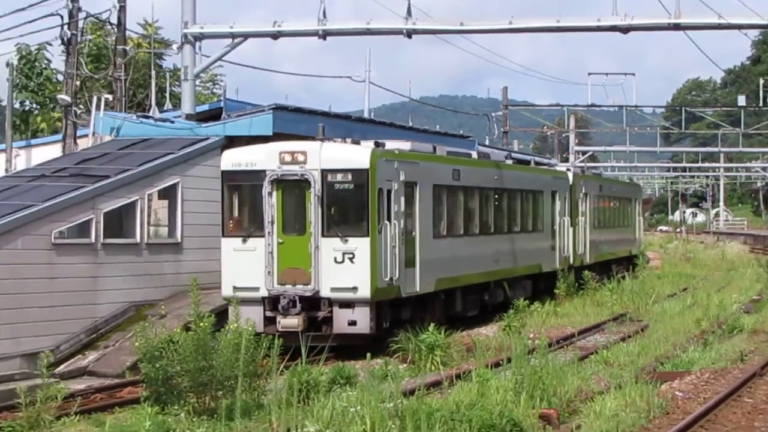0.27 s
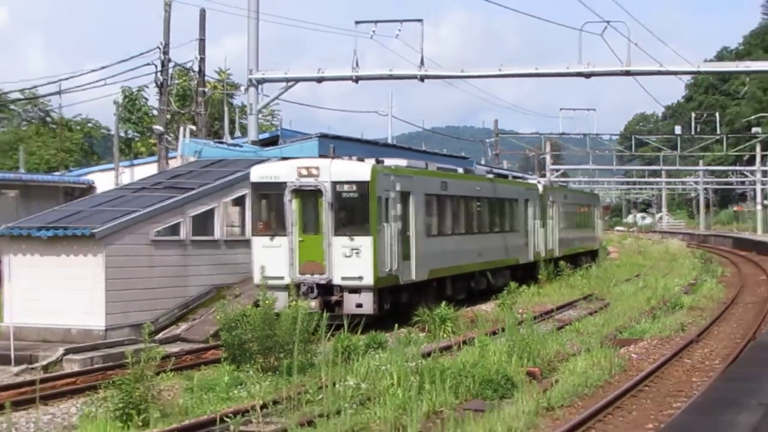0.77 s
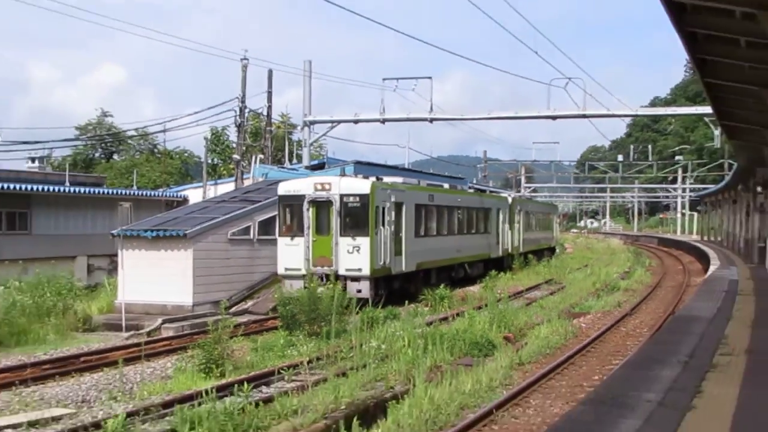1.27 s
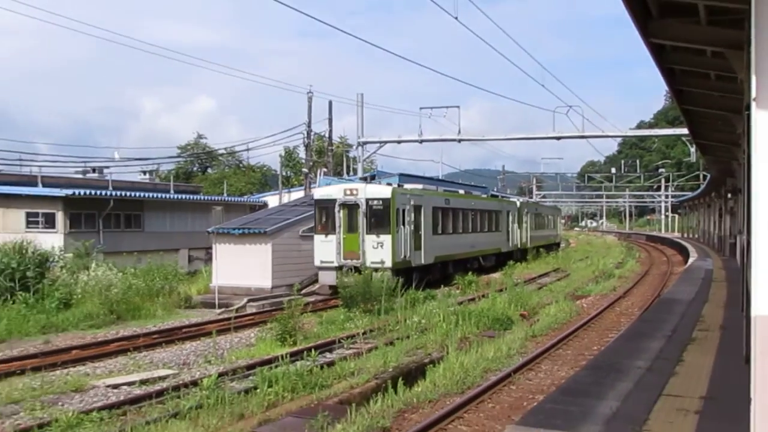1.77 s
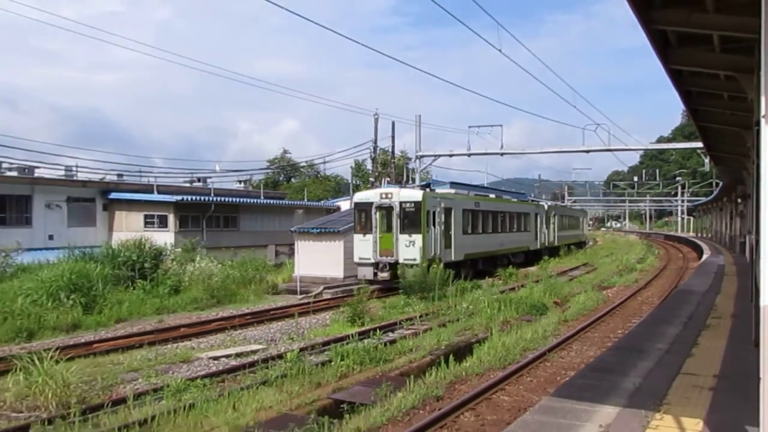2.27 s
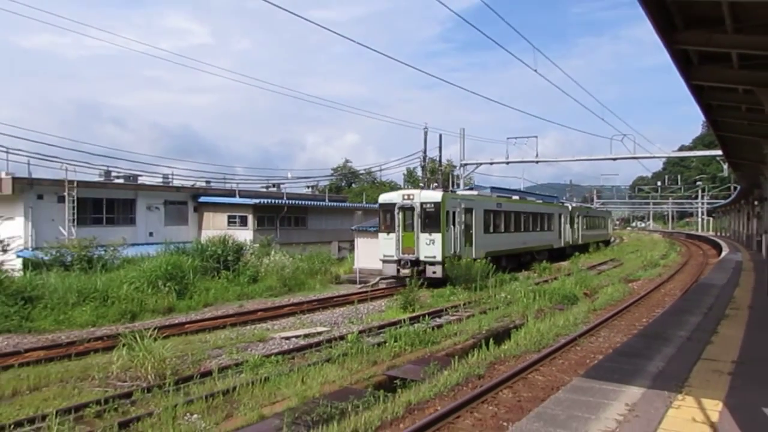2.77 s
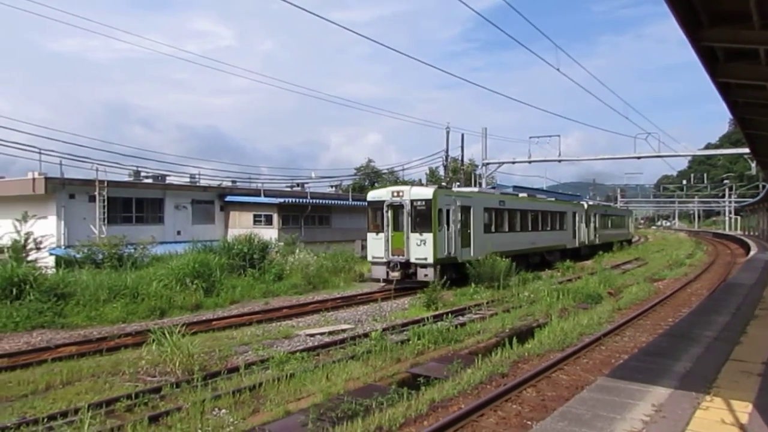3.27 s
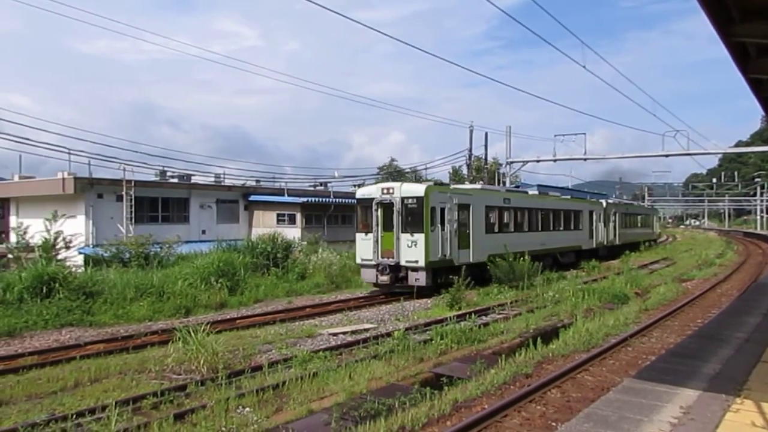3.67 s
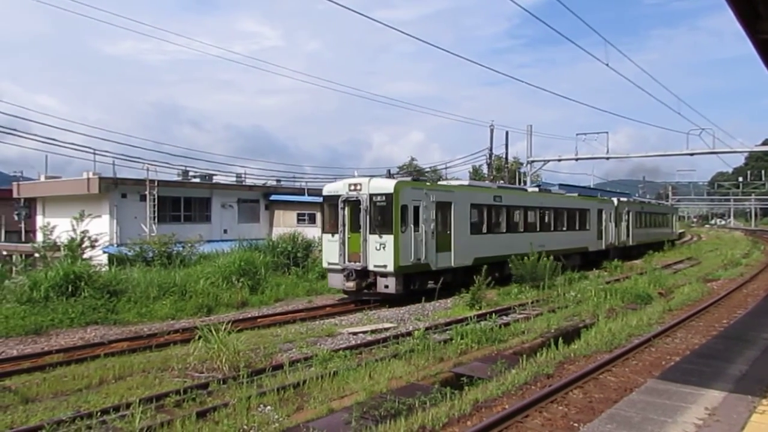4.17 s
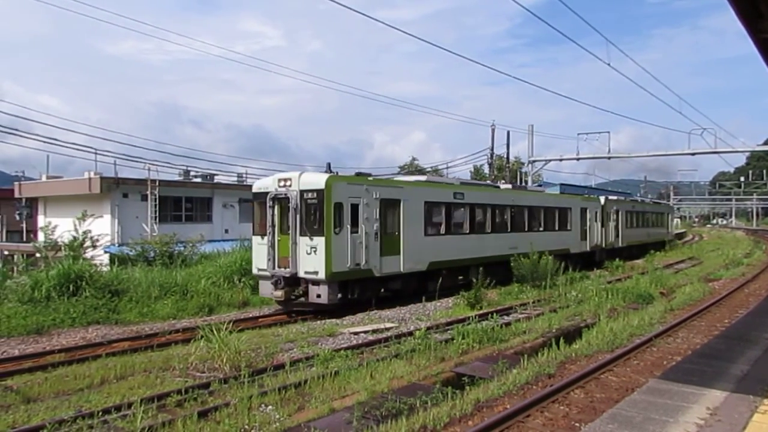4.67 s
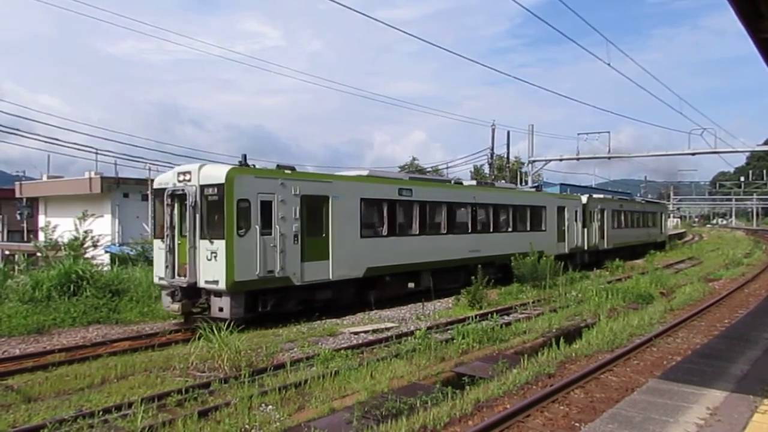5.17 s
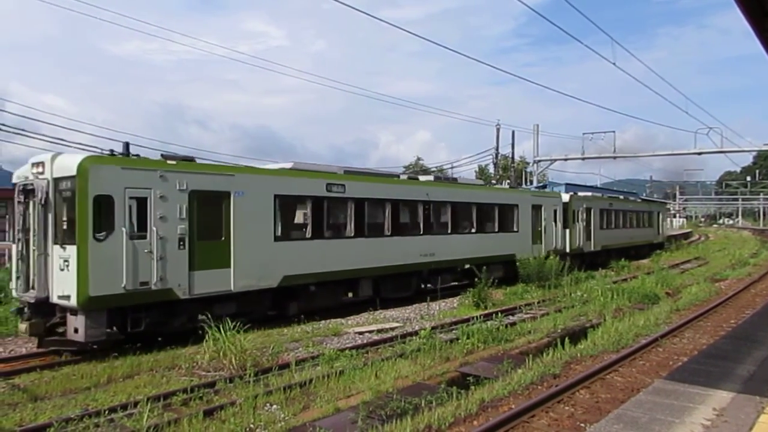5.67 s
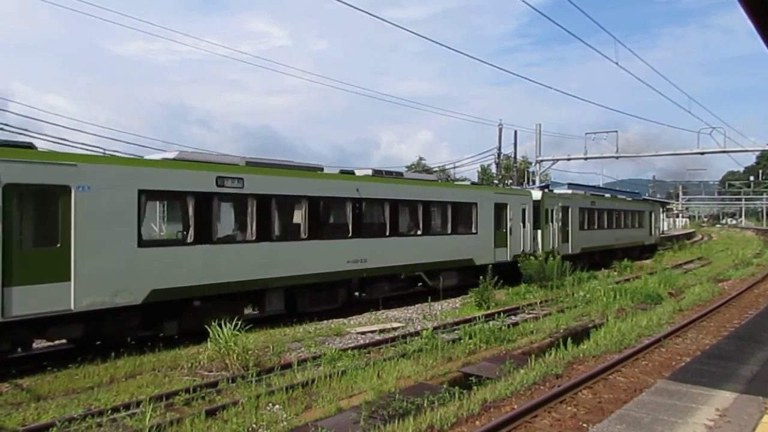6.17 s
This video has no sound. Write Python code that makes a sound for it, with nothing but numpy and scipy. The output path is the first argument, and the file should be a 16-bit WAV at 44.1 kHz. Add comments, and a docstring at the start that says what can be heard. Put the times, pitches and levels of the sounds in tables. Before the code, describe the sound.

Low throbbing diesel engines rev up as a railcar approaches, wind thumping the microphone, until rolling clatter and thin high wheel squeal take over.

```python
"""Two diesel exhausts drone upward and beat as a two-car railcar leaves a country station on a curve.
The drones are harmonics of the firing rate; the engine bays, turbocharger hiss and rolling wheels are
filtered noise. Rail joints ring decaying bogie modes, flanges scrape as noise coloured by resonances,
and low engine groans and wheel squeals are roughened tones. A faint breeze flutters and a few gusts
thump the microphone."""
import sys
import numpy as np
from scipy import signal
from scipy.fft import rfft, irfft, next_fast_len
from scipy.io import wavfile

SR = 44100
rng = np.random.default_rng(int(sys.argv[2]) if len(sys.argv) > 2 else 0)


def store_pcm(level_fs):
    """Save levels as 16-bit WAV."""
    pcm = np.round(np.clip(level_fs, -1, 1) * 32767).astype(np.int16)
    wavfile.write(sys.argv[1], SR, np.atleast_2d(pcm).T)


N = 283563
T = np.arange(N) / SR  # s
FREQ = np.maximum(np.arange(N // 2 + 1) * SR / N, 1)  # Hz

# engine speed: [t/s, firing rate f/Hz]
FIRING = [(0, 61.2), (1.8, 63.2), (2.15, 67), (2.7, 69), (4.05, 71.9), (4.5, 76.1), (4.8, 78), (5.3, 79.6),
          (6.43, 81.3)]
# moments when the two drones cancel; the engines slip one firing apart from each to the next: [t/s]
BEATS = [-.3, .26, .8, 1.37, 1.95, 3.53, 5.08, 6.04, 6.6]
# exhaust drone when in step: [t/s, level/dB]
EXHAUST = [(0, -18), (1.15, -17.5), (1.65, -15.5), (2.65, -11), (3.5, -17), (4.05, -12), (4.25, -16),
           (4.9, -11), (5.3, -15.5), (5.55, -21.5), (6.43, -22)]
# the approach: [t/s, engine roar level/dB, wheel noise level/dB]
APPROACH = [(0, -27, -51), (.25, -33.5, -58), (.95, -30.5, -54), (1.4, -32, -54.5), (2, -26, -50),
            (2.5, -24, -48), (3.7, -20.5, -43.5), (4.3, -17.5, -35), (4.8, -23, -34.5), (5.25, -21.5, -31),
            (5.7, -24.5, -32), (6.43, -26.5, -30)]
# engine bay noise spectrum: [f/Hz, level per Hz/dB]
ROAR = [(45, 11), (100, 13), (160, 9), (240, 5.5), (380, 3), (550, 0), (750, 3), (1000, -3), (1450, -7.5),
        (1750, -12), (2100, -16.5), (2550, -33.5), (4000, -63)]
# resonances of engine block and housings: [f/Hz, width/Hz, level/dB]
HOUSING_MODES = [(420.4, 78, 9), (613, 28, 3.5), (682, 44, 7.5), (686, 28, 0), (1083, 87, 4),
                 (1480, 190, 2.5)]
# turbocharger hiss, spooling up under load: [t/s, centre f/Hz, level/dB]
TURBO = [(0, 9300, -86), (1.7, 9700, -88), (2.05, 10600, -63), (2.5, 12300, -52), (2.95, 12400, -55),
         (3.3, 11940, -52), (4.0, 12200, -48), (6.43, 12700, -54)]
# wheels rolling on the rail: [f/Hz, level per Hz/dB]
ROLLING = [(1500, 1), (2600, -6), (2950, -5.5), (3600, -1), (4500, 0.5), (5700, -0.5), (6500, 3.5),
           (7000, 0.5), (7800, 1), (9500, 1), (10000, 0.5), (11000, -4.5), (15800, -12)]
# resonances of the rails: [f/Hz, width/Hz, level/dB]
RAIL_MODES = [(3180, 160, 4.5), (4400, 97, 3.5), (4910, 80, 5), (5220, 80, 5.5)]
# bogies rumbling on the track: [f/Hz, level per Hz/dB]
RUMBLE = [(50, -37), (110, 3), (240, -1.5), (330, -2.5), (520, -7), (900, -37), (2000, -58)]
# running gear, heard only from near by: [f/Hz, level per Hz/dB]
CLATTER = [(400, 9.5), (800, 0), (1100, 4), (1500, 0), (1800, -7), (2600, -9), (2930, -14), (3300, -14),
           (5000, -19.5)]
# resonances, lettered by rising pitch: A and B low engine groans, the rest wheel modes;
# M is mode N heard lower as the car draws level: {letter: [f/Hz, width/Hz, level/dB]}
RESONANCES = {"A": (415, 20, 0), "B": (675, 20, 0), "C": (1114, 30, 3), "D": (1163, 30, 3),
              "E": (2637, 40, 8), "F": (5170, 90, 7), "G": (6240, 90, 10), "H": (6900, 240, 7),
              "I": (7390, 100, 6), "J": (7820, 120, 4), "K": (8535, 130, 6), "L": (8890, 100, 4),
              "M": (9477, 80, 2), "N": (9593, 80, 2), "O": (9900, 120, 4), "P": (10420, 100, 4),
              "Q": (10800, 100, 5), "R": (11166, 80, 1)}
# engine groans (A, B) and wheel squeals: [start t/s, end t/s, letter, level/dB, roughness 0-1]
GROANS_AND_SQUEALS = [(-.1, 0.2, "A", -31.5, 0.6), (0.757, .92, "B", -36, 0.2), (1.08, 1.6, "K", -49, 0.85),
                      (.95, 3.1, "K", -52, 0.85), (1.58, 2.28, "K", -43, 0.85),
                      (2.256, 2.78, "K", -46.5, 0.85), (2.5, 4, "K", -64, 0.95), (2.75, 3.9, "P", -49, 0.9),
                      (3.76, 4.1, "Q", -49, .5), (4.14, 4.56, "R", -31, 0.65), (4.2, 4.62, "N", -30.5, .65),
                      (4.44, 4.68, "P", -27, 0.95), (4.555, 4.859, "Q", -32, 0.9),
                      (4.5, 5.8, "K", -33.5, .85), (4.784, 5.04, "H", -27, 0.8),
                      (4.995, 5.677, "H", -34.5, 1), (5.255, 5.693, "Q", -27, 0.46),
                      (5.13, 5.68, "C", -33.5, 0.17), (5.5, 6.098, "C", -39, 0.14),
                      (5.48, 6.2, "D", -38.5, 0.25), (5.8, 6.5, "K", -34, .9), (6.02, 6.5, "M", -31, 0.7),
                      (6.32, 6.55, "D", -28, 0.3), (5.5, 6.8, "E", -49, 0.3), (5.7, 6.497, "F", -48, .7)]
# gusts on the microphone: [t/s, Gaussian length/s, level/dB before limiting, centre f/Hz]
GUSTS = [(0.126, 0.011, -6.5, 102), (0.203, 0.0068, -6.5, 171), (0.376, 0.01, -17.5, 130),
         (0.426, 0.0092, -22.5, 130), (0.898, 0.014, -13.5, 105), (0.954, 0.0072, -8.5, 137),
         (1.001, 0.0061, -9, 127), (1.076, 0.01, -14.5, 124), (1.35, 0.019, -30, 159),
         (2.151, 0.028, -18.5, 104), (4.902, .015, -29, 190), (5.103, .025, -22, 191),
         (5.385, 0.01, -19.5, 170), (5.83, 0.044, -30.5, 190)]
# wheels over rail joints: [t/s, level/dB, rise/s]
JOINTS = [(2.060, -26, .005), (2.677, -12, .002), (2.703, -20, .003), (3.152, -15.5, .004),
          (3.180, -22, .008), (3.263, -25, .002), (3.940, -22, .012), (4.288, -19, .012),
          (4.342, -21, .012)]
# modes of the bogie: [f/Hz, t60/s, level/dB]
BOGIE_MODES = [(296.5, 0.45, -6.5), (369, 0.24, -3), (510.5, 0.056, 2.5), (595, 0.036, 2), (800, 0.083, -3),
               (975, .02, 0), (1116, 0.038, 2.5), (1253, 0.015, 2), (1490, 0.032, -7.5)]
# a flange touches the outer rail:
# [start t/s, crest t/s, release t/s, crest level/dB before bite and release, bite/s]
CONTACTS = [(4.013, 4.04, 4.06, -31.5, .02), (4.148, 4.306, 4.62, -29.5, .02),
            (4.245, 4.28, 3.9, -25.5, .02), (4.615, 4.7, 4.85, -28, .02), (4.7, 5.157, 6.2, -22, .05),
            (5.76, 5.96, 5.98, -26, .15), (6.03, 6.28, 6.25, -27.5, .06)]
# colour of the scraping: [f/Hz, level per Hz/dB]
SCRAPE_COLOUR = [(3000, -54), (4800, -36), (5800, -7.5), (6800, 2.5), (9000, 4.5), (11000, 1),
                 (11700, -7.5), (12500, -3), (12950, -13), (13900, -4), (14700, -9), (15800, -18)]
# the highest wheel mode, singing on through the curve: [t/s, level/dB before overall lift and pan]
SHRILL = [(4.56, -47), (4.62, -29), (5.15, -24.5), (5.35, -26.5), (5.57, -17.5), (5.7, -20.5), (6.3, -19.5),
          (6.43, -22)]
# its close partials, sinking as the car draws level:
# [f/Hz at first, sag/(Hz per s), relative level/dB, roughness 0-1]
SHRILL_PARTIALS = [(13760, 95, -10, .9), (13880, 20, -7, .85), (13955, 15, -2, .6), (14130, 72, 0, .55)]
# stereo difference relative to the sum: [f/Hz, level/dB]
WIDTH = [(60, -51), (200, -40), (400, -24), (700, -14.5), (1300, -17.5), (2400, -54), (5000, -36),
         (8000, -1), (15000, -4)]

ABREAST_S, SECOND_FADE_DB_PER_S = 5, 10.5  # from here the second exhaust fades behind the first
NEAR_DB = -31.5  # wheel noise when the first car is close
# level when close, and dB gained for each dB of wheel noise
CLATTER_DB, CLATTER_GROWTH = -27, 1.38
RUMBLE_DB, RUMBLE_GROWTH = -28, 0.11
RUMBLE_START_S, RUMBLE_RISE_S = 1.41, 0.67  # the track rumbles once the cars gather speed
FADE_SHARE = 0.33  # part of a groan or squeal spent swelling, and again fading
WAKE_DB, WAKE_LAG_S, WAKE_S = -14.5, 0.031, 0.02  # weaker eddies trail each gust
PRESS_DB_PER_S, EASE_DB_PER_S = 19, 28  # a contact's rise before its crest and fall after it
CREST_DB, RELEASE_S = 1.5, 0.045  # rounding of the crest; time constant of letting go
# a light touch is brighter: neutral level, treble dB gained per dB below it, most gain
NEUTRAL_DB, BRIGHTEN, BRIGHTEST_DB = -22.5, 1.2, 21
TOP_HZ = 15600  # upper limit of the whole sound


def undb(db):
    """Logarithmic level: decibels to amplitude gain."""
    return 10 ** (np.asarray(db) / 20)


def curve(rows, axis=1):
    """Linear interpolation: one column of a table against time."""
    rows = np.array(rows)
    return np.interp(T, rows[:, 0], rows[:, axis])


def unit(x):
    """Normalisation: scale to rms 1."""
    return x / np.sqrt(np.mean(np.abs(x) ** 2))


def colour(points, resonances=()):
    """Spectral envelope: gain at each frequency, with resonant humps and steep outer skirts."""
    hz, db = np.transpose(points)
    humps = sum(peak / (1 + (2 * (FREQ - f) / w) ** 2) for f, w, peak in resonances)
    gain = undb(np.interp(np.log(FREQ), np.log(hz), db) + humps)
    return gain / (1 + (hz[0] / FREQ) ** 4) / (1 + (FREQ / hz[-1]) ** 20)


def shape(x, gain):
    """Linear filtering: multiply the spectrum by a gain, to rms 1."""
    size = next_fast_len(N, True)
    gain = np.interp(np.arange(size // 2 + 1) * SR / size, FREQ, gain)
    return unit(irfft(rfft(x, size) * gain, size)[..., :N])


def walk(hz, order=4):
    """Low-passed noise: rms 1, moving at up to about hz; a low order leaves more quick flicker."""
    size = next_fast_len(N, True)
    gain = 1 / (1 + (np.arange(size // 2 + 1) * SR / size / hz) ** order)
    return unit(irfft(rfft(rng.standard_normal(size)) * gain, size)[:N])


def spread(gain, drive=1):
    """Partial coherence: stereo noise, pulsed by drive, then filtered; widest in the treble."""
    mid, side = rfft(rng.standard_normal((2, N)) * drive)
    width = colour(WIDTH)
    side = side * width
    return unit(irfft(np.array([mid + side, mid - side]) * gain / np.sqrt(1 + width ** 2), N))


def sing(hz, rough, skirt_hz=95, waver_hz=7, lead=0.37, apart=0.64):
    """Narrow-band oscillation: a wavering tone, smeared by roughness, on average leading at the left."""
    rough = np.clip(rough, 0, 1)
    height = np.mean(hz) / 10000  # skirt, waver, lead and apart (radians) are stated for 10 kHz
    wavering_hz = hz + waver_hz * np.sqrt(height) * walk(24.2)
    tone = np.exp(2j * np.pi * np.cumsum(wavering_hz) / SR)
    skirt = skirt_hz * np.sqrt(height)  # higher modes smear more widely
    smear = unit(walk(skirt, order=2) + 1j * walk(skirt, order=2))
    voice = tone * (np.sqrt(1 - rough ** 2) + rough * smear)
    angle = (lead + apart * walk(14.5)) * height
    return unit(np.real(voice * np.exp(.5j * np.array([angle, -angle]))))


def exhausts(phase, second_db=-4, linger=0.19, octave_db=-10.0, pipe_hz=134, pipe_width_hz=28,
             third_db=-44, fourth_db=-49):
    """Beating: two drones drift in and out of step; octaves beat twice as fast and excite the pipe."""
    slip = 2 * np.pi * (np.interp(T, BEATS, np.arange(len(BEATS))) + .5)
    slip = slip - linger * np.sin(slip)  # they stay longer in step than opposed
    second = undb(second_db - SECOND_FADE_DB_PER_S * np.maximum(T - ABREAST_S, 0))

    def pair(k):
        """Superposition: both exhausts at k times the firing rate."""
        first_tone = np.sin(k * (phase + slip / 2))
        second_tone = np.sin(k * (phase - slip / 2))
        return (first_tone + second * second_tone) / (1 + second)

    pipe = undb(octave_db) / np.hypot(1, 2 * (2 * curve(FIRING) - pipe_hz) / pipe_width_hz)
    drone = undb(curve(EXHAUST)) * (pair(0.99) + pipe * pair(2))  # the lower tone sits 1 % flat
    overtones = sum(undb(db + 3.4 * walk(3.3)) * np.sin(k * phase)
                    for k, db in ((3, third_db), (4, fourth_db)))
    return np.sqrt(2) * (drone + overtones)


def engines(throb=0.16, ordered=0.48, unsteady_db=3.5):
    """Forced vibration: firing drives the exhausts, and the bay answers with knocking orders and noise."""
    phase = 2 * np.pi * np.cumsum(curve(FIRING) * (1 + 0.0023 * walk(9.0))) / SR
    orders = sum(undb(unsteady_db * walk(7)) * np.sin(k * phase + 2 * np.pi * rng.random())
                 for k in range(6, 24))
    body = colour(ROAR, HOUSING_MODES)  # an order swells as it sweeps through a housing resonance
    # the lines are clearest at low speed; under load the roar covers them
    clear = ordered * (FIRING[0][1] / curve(FIRING)) ** 3
    bay = spread(body, 1 + throb * np.cos(phase)) + clear * shape(orders, body)
    return exhausts(phase) + unit(bay) * undb(curve(APPROACH))


def turbo(half_width_hz=2200):
    """Broadband flow noise: intake hiss whose centre frequency follows the turbine."""
    band = np.array([walk(half_width_hz) + 1j * walk(half_width_hz) for _ in range(2)])
    ports = band + band.mean(axis=0)  # left and right share part of the hiss
    carrier = np.exp(2j * np.pi * np.cumsum(curve(TURBO, axis=1)) / SR)
    return unit(np.real(ports * carrier)) * undb(curve(TURBO, axis=2))


def rolling(rattle_db=0.87, clatter_db=1.0):
    """Rolling contact noise: steel wheels hiss; rumble and clatter grow with speed and nearness."""
    wheel_db = curve(APPROACH, axis=2)
    nearness_db = wheel_db - NEAR_DB
    under_way = np.clip((T - RUMBLE_START_S) / RUMBLE_RISE_S, 0, 1)
    hiss = spread(colour(ROLLING, RAIL_MODES), undb(rattle_db * walk(30))) * undb(wheel_db)
    rumble = spread(colour(RUMBLE)) * undb(RUMBLE_DB + RUMBLE_GROWTH * nearness_db)
    clatter = spread(colour(CLATTER), undb(clatter_db * walk(55)))
    clatter = clatter * undb(CLATTER_DB + CLATTER_GROWTH * nearness_db)
    return hiss + under_way * rumble + clatter


def breeze(breeze_db=-45, gustiness_db=4.5):
    """Turbulent pressure: moving air keeps a faint, independent flutter on each microphone port."""
    spectrum = colour([(28, -23), (60, -12), (130, -0.5), (300, -9), (800, -32)])  # f/Hz, level/dB
    flutter = shape(rng.standard_normal((2, N)), spectrum)
    return flutter * undb(breeze_db + gustiness_db * walk(3.7))


def groans_and_squeals():
    """Resonance and stick-slip: low engine groans, then wheel modes that squeal with uneven strength."""
    out = 0
    for letter in sorted({row[2] for row in GROANS_AND_SQUEALS}):
        hz = RESONANCES[letter][0]
        tone, smeared = sing(hz, 0), sing(hz, 1.0)
        strength = unit(undb(1.2 * walk(13)))
        for start, end, _, db, rough in (row for row in GROANS_AND_SQUEALS if row[2] == letter):
            to_edge = np.minimum(T - start, end - T)
            swell = np.sin(np.pi / 2 * np.clip(to_edge / (FADE_SHARE * (end - start)), 0, 1)) ** 2
            rough = np.clip(rough, 0, 1)
            voice = np.sqrt(1 - rough ** 2) * tone + rough * smeared
            out = out + undb(db) * swell * strength * voice
    return out


def gusts(apart=1.2, skirt=0.8, apart_hz=150, core=2.2):
    """Eddy pressure: gusts thump the ports; small eddies sound higher and differ more between ports."""
    out = 0
    for s, length, db, hz in GUSTS:
        swell = np.exp(-.5 * ((T - s) / length) ** 2)
        swell = swell + undb(WAKE_DB) * np.exp(-.5 * ((T - s - WAKE_LAG_S) / WAKE_S) ** 2)
        band = 1 / (1 + (FREQ / (hz * skirt)) ** 3.56) / (1 + (hz / skirt / FREQ) ** 3)
        mid, side = shape(rng.standard_normal((2, N)), band)
        # the eddy's core sucks once at the ports
        suck = np.cos(2 * np.pi * hz * (T - s)) * np.exp(-.5 * ((T - s) * hz) ** 2)
        mid = mid - core * suck
        side = side * apart * (hz / apart_hz) ** 2
        eddy = np.array([mid + side, mid - side]) * swell
        out = out + undb(db) * unit(eddy) * np.sqrt(np.mean(swell ** 2))
    # the hardest thumps overload the microphone and are softly limited, then kept dull
    ceiling, dull_hz = .8, 650
    limited = ceiling * np.tanh(out / ceiling)
    return signal.sosfiltfilt(signal.butter(3, dull_hz, fs=SR, output="sos"), limited)


def joints(travel_s=0.01113):
    """Impulse response with dispersion: wheels drop over gaps and ring the bogie, high modes first."""
    out = np.zeros(N)
    top_hz = BOGIE_MODES[-1][0]
    for s, db, rise_s in JOINTS:
        i = int(s * SR)
        for hz, t60, mode_db in BOGIE_MODES:
            delay_s = travel_s * (np.sqrt(top_hz / hz) - 1)  # bending waves travel slower when low
            t = np.maximum(T[:SR // 2] - delay_s, 0)
            ring = np.exp(-np.log(1000) * t / t60) * (1 - np.exp(-(t / rise_s) ** 2))
            out[i:i + len(t)] += undb(db + mode_db) * ring * np.sin(2 * np.pi * (hz * t + rng.random()))
    return out


def pressure():
    """Contact force: each flange contact bites, presses harder, eases and lets go; the strongest rules."""
    out = 0
    for start, crest, release, db, bite_s in CONTACTS:
        slope_db = np.maximum(PRESS_DB_PER_S * (crest - T), EASE_DB_PER_S * (T - crest))
        sag_db = np.hypot(slope_db, CREST_DB) - CREST_DB
        bite = np.clip((T - start) / bite_s, 0, 1)
        touch = bite * np.exp(-np.maximum(T - release, 0) / RELEASE_S)
        out = np.maximum(out, touch * undb(db - sag_db))
    return out


def scraping(shimmer_db=2.4, band_hz=450, bright_hz=11500, lag_s=.000012, diffuse=0.64):
    """Dry friction: gritty rubbing rings the resonances; bands swell as the contact point wanders."""
    grit = rfft(rng.standard_normal((2, N))) * colour(SCRAPE_COLOUR, RESONANCES.values())
    mid, side = grit[0], diffuse * grit[1] / (1 + (6500 / FREQ) ** 8)  # wide only in the treble
    lead = np.exp(1j * np.pi * FREQ * lag_s)  # the left port hears it first
    size = next_fast_len(2 * N)
    ports = rfft(unit(irfft(np.array([(mid + side) * lead, (mid - side) / lead]), N)), size)
    hz = np.arange(ports.shape[1]) * SR / size
    out = 0
    for k in range(4):  # four interleaved combs of bands, each swelling on its own
        comb = np.maximum(np.cos(np.pi / 2 * (hz / band_hz - k)), 0) ** 2
        out = out + irfft(ports * comb, size)[:, :N] * undb(shimmer_db * walk(17.0))
    top = signal.sosfiltfilt(signal.butter(3, bright_hz, "high", fs=SR, output="sos"), out)
    rub = pressure()
    bright = (undb(NEUTRAL_DB) / np.maximum(rub, 1e-9)) ** BRIGHTEN
    bright = np.minimum(bright, undb(BRIGHTEST_DB))
    return (out + top * (bright - 1)) * rub


def shrill(lift_db=0.5, left_over_right_db=-1.3, trade_db=2.2):
    """Sustained self-excitation: close partials of the highest mode trade level and sink in pitch."""
    age = T - SHRILL[0][0]
    voice = 0
    for hz, sag, db, rough in SHRILL_PARTIALS:
        trade = unit(undb(trade_db * walk(5.5)))
        partial = sing(hz - sag * age, rough, skirt_hz=140, waver_hz=8.8, lead=1.22, apart=0.61)
        voice = voice + trade * undb(db) * partial
    pan = undb(np.array([[left_over_right_db], [-left_over_right_db]]) / 2)
    return pan * unit(voice) * undb(curve(SHRILL) + lift_db) * (age > 0)


def scene():
    """Superposition: train and wind add together."""
    train = engines() + turbo() + rolling() + groans_and_squeals() + joints() + scraping() + shrill()
    return train + breeze() + gusts()


def record(dry):
    """Band limiting: a steep low-pass removes the extreme treble."""
    return signal.sosfilt(signal.ellip(10, .2, 80, TOP_HZ, fs=SR, output="sos"), dry)


dry = scene()
out = record(dry)
store_pcm(out)
```